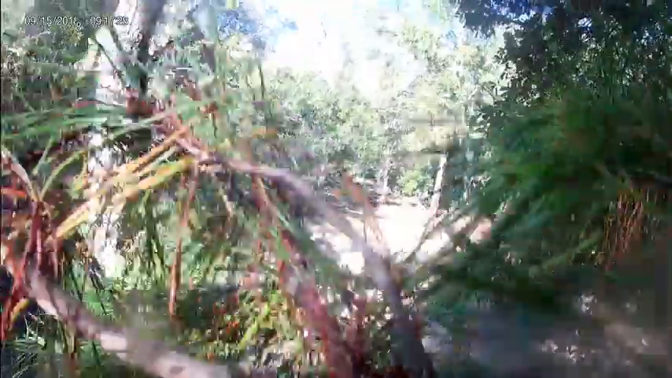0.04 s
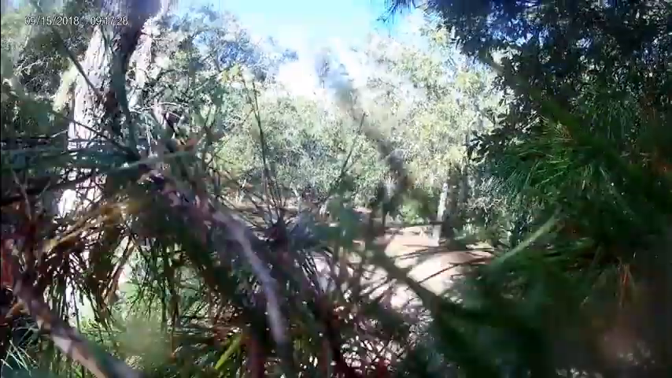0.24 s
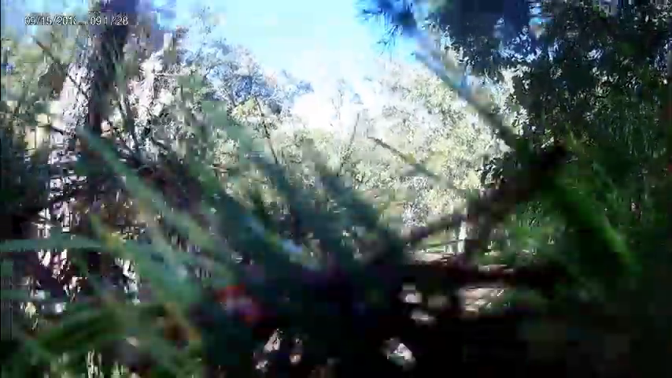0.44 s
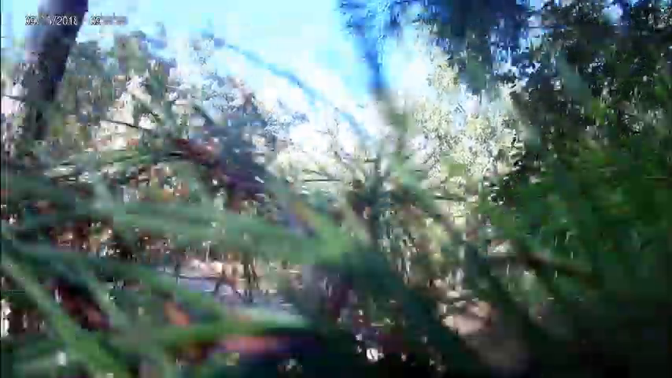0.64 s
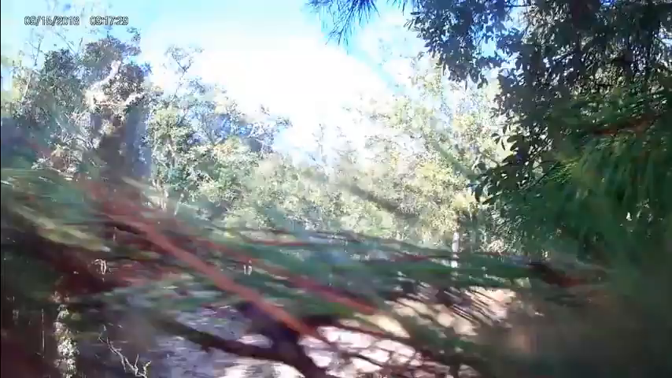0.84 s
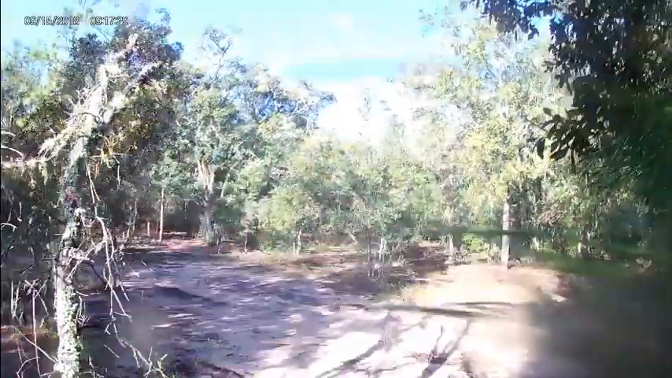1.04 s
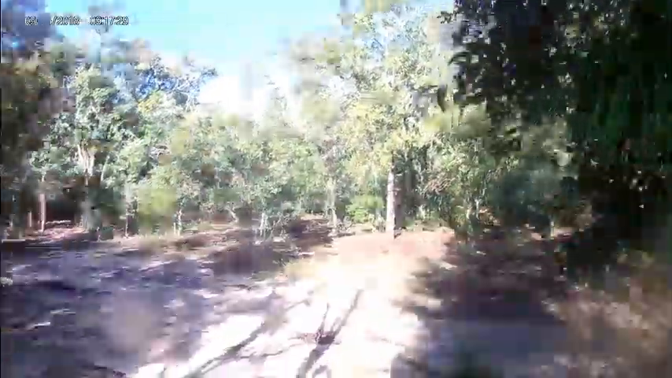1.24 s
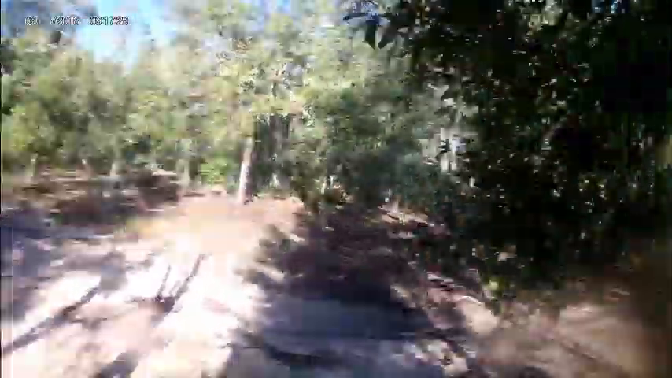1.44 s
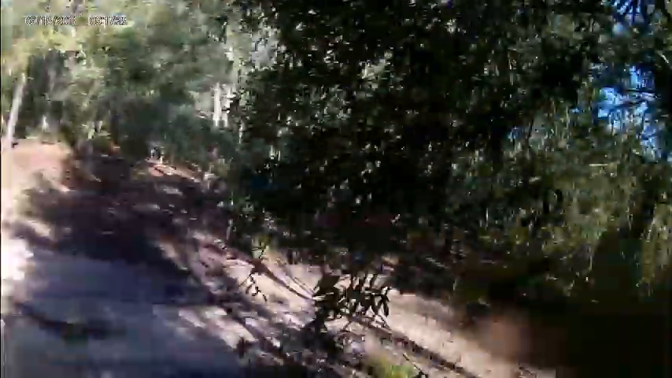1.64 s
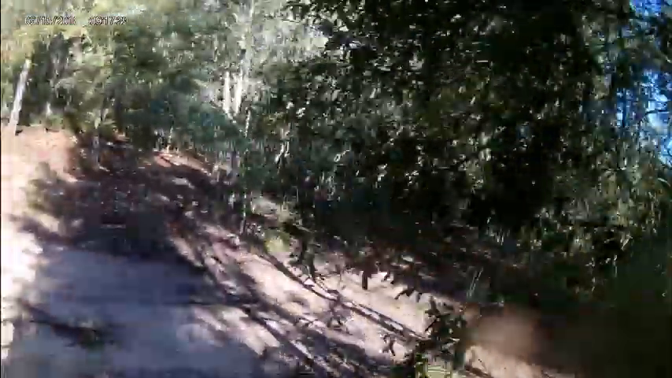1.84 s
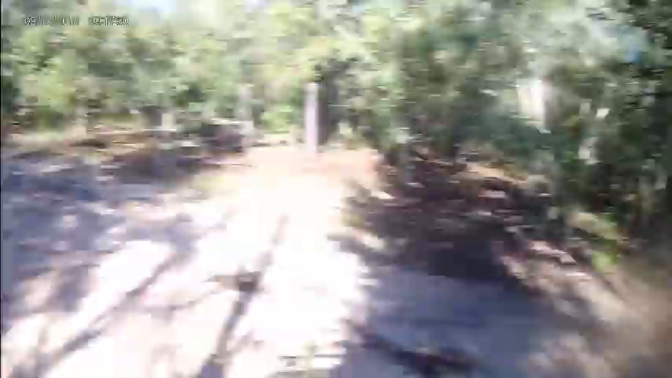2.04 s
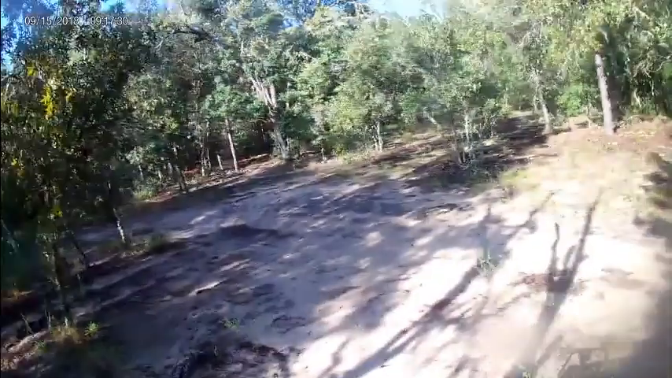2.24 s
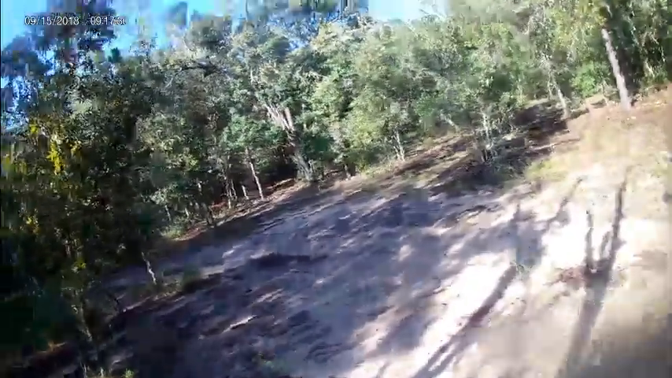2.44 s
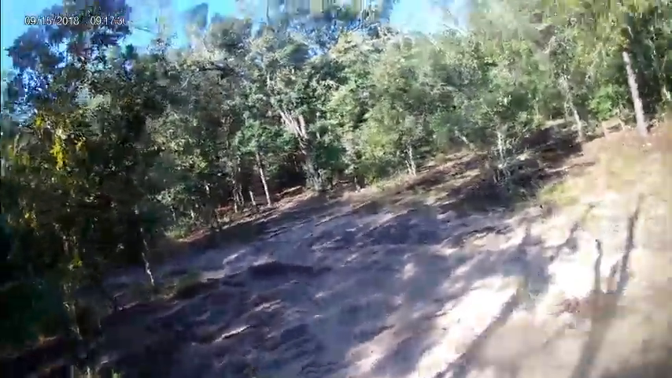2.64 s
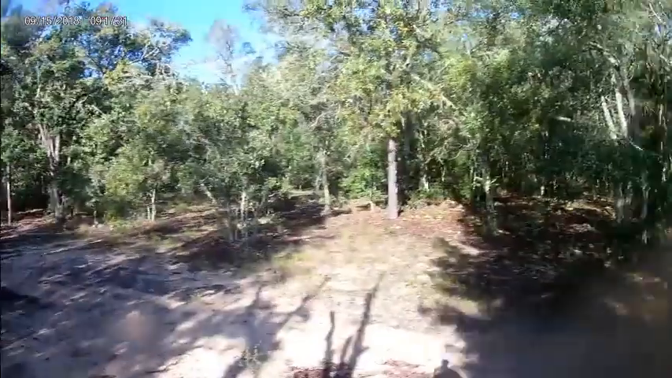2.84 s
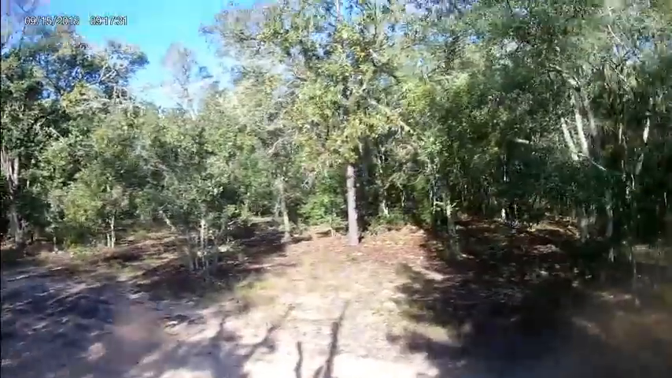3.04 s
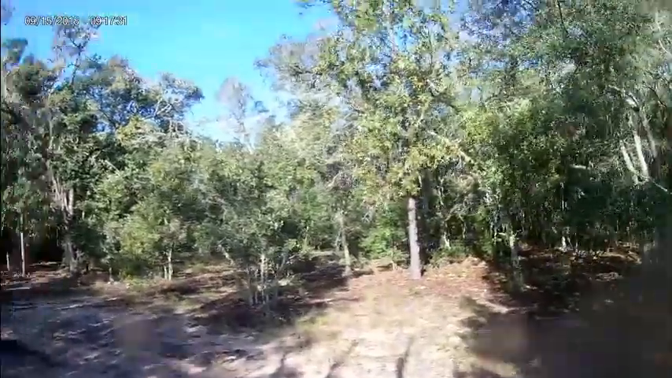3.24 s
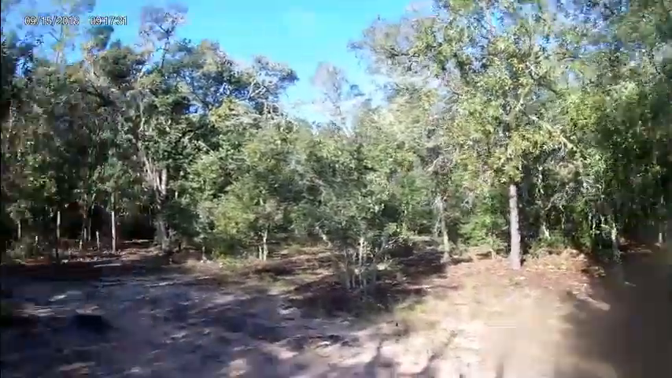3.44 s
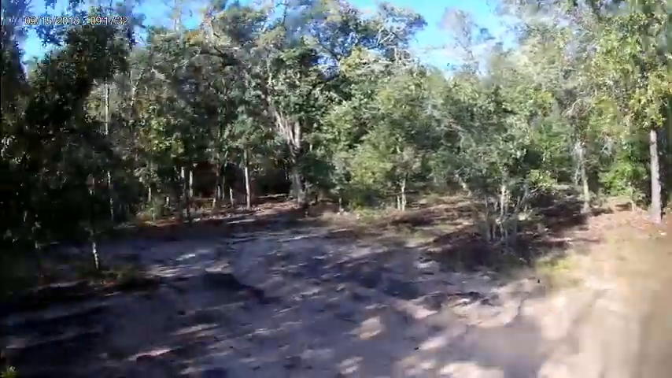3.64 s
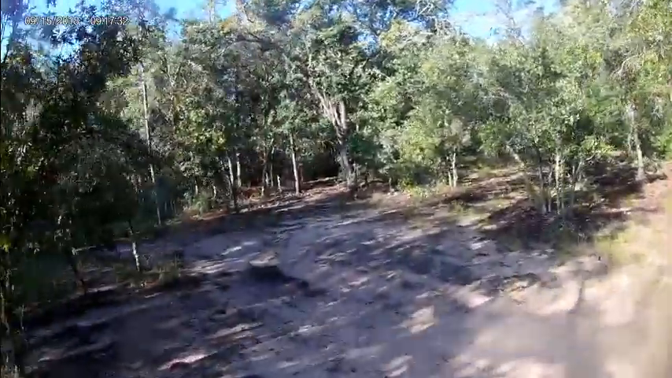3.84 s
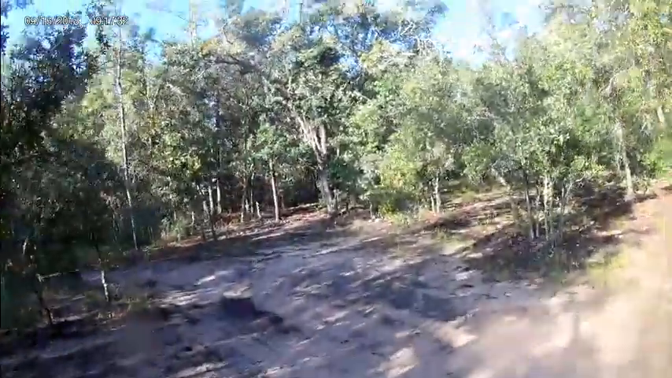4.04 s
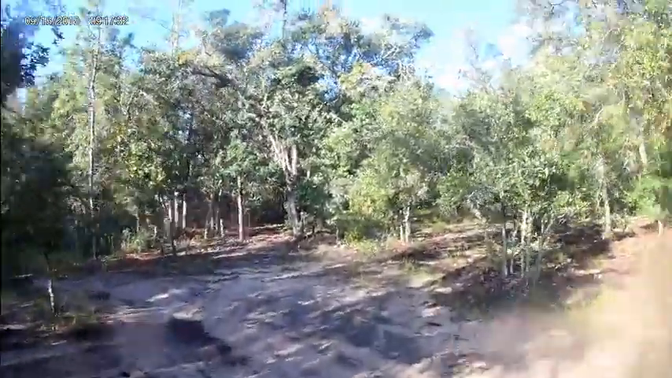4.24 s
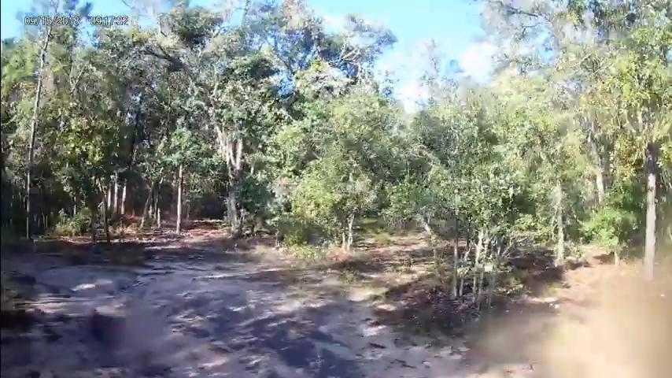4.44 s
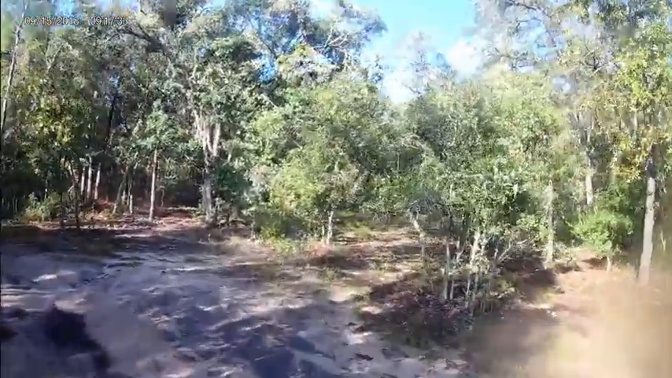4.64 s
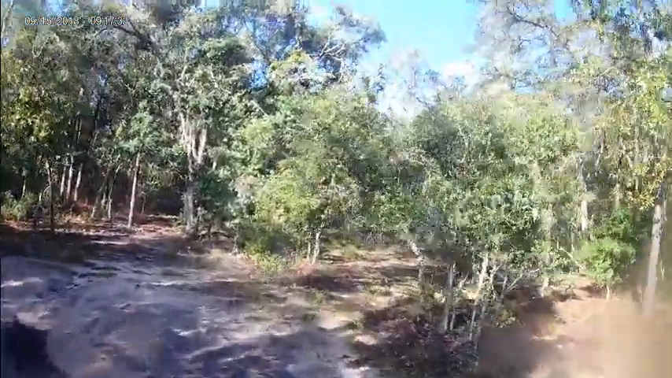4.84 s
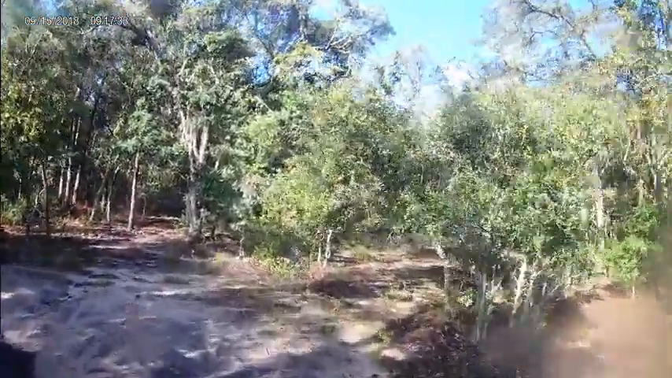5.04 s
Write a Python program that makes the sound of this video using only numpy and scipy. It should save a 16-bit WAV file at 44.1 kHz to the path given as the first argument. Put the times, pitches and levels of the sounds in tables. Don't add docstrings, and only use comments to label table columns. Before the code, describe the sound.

Outdoors on a sandy wooded track, a branch rubs a slow quad bike's camera: light brushing, then firm twig cracks and a hard sweep of needles, all boxy and resonant. It stops abruptly just after one second. A dull, low engine chug remains far below that level, dipping, with a small cluster of hollow rattles, then steadily speeding up over rumble and faint hiss, with a faint gear whine last.

```python
import sys
import numpy as np
from scipy import signal
from scipy.fft import rfft, irfft
from scipy.io import wavfile
from scipy.ndimage import uniform_filter1d

SR = 44100
rng = np.random.default_rng(int(sys.argv[2]) if len(sys.argv) > 2 else 0)


def volts_from_db(level):
    exponent = np.asarray(level, float) / 20
    return 10 ** exponent


def master(y):
    cut = np.clip(np.atleast_2d(y).T, -1, 1)
    pcm = np.round(cut * 32767)
    wavfile.write(sys.argv[1], SR, pcm.astype(np.int16))


N = 224954
T = np.arange(N) / SR

# start_s [s], twig_push_db [dB], needle_slide_db [dB]
BRUSHES = [
    [(0.0, -57, -66), (0.02, -58, -56.5), (0.094, -59, -56.5), (0.116, -53, -50), (0.176, -52, -56),
     (0.192, -49, -52), (0.26, -57, -65)],
    [(0.26, -49, -68), (0.306, -53, -52.5), (0.316, -50, -44.5), (0.348, -51.5, -52), (0.414, -46.5, -45.5),
     (0.434, -49, -58), (0.486, -57.5, -62.5), (0.6, -48.5, -54)],
]
# start_s [s], twig_push_db [dB], needle_slide_db [dB]
SHOVE = [
    (0.606, -41.5, -51),
    (0.662, -32, -42),
    (0.74, -35, -44),
    (0.752, -34, -40.5),
    (0.844, -36, -34),
    (0.864, -45.5, -33),
    (0.906, -32.5, -26.5),
    (1.088, -40, -37.5),
    (1.096, -46, -34.5),
]
# start_s [s], push_db [dB], slide_db [dB]
TOUCHES = [
    (1.22, -56.5, -80),
    (1.30, -63, -90.5),
    (1.372, -51, -88),
]
# start_s [s], peak_db [dB], thud_db [dB], needle_flick_db [dB]
BLOWS = [(0.118, -36, -58, -55.5), (0.157, -43, -37.5, -64), (0.193, -37, -47, -61.5),
         (0.232, -46, -53, -54), (0.315, -32.5, -48, -61), (0.344, -38, -54, -51), (0.388, -32, -68, -56),
         (0.407, -29, -42.5, -54), (0.652, -24, -31.5, -58), (0.693, -21.5, -32.5, -47),
         (0.749, -22, -38, -47), (0.769, -22.5, -36, -44), (0.794, -27, -34.5, -39),
         (0.83, -20, -36, -38.5), (0.875, -25, -44, -51), (0.9, -15.5, -32.5, -37),
         (0.904, -18, -32.5, -39.5), (0.929, -23, -37.5, -47.5), (0.995, -14, -38, -45),
         (1.004, -16.5, -49, -40.5), (1.032, -14.5, -50, -27.5), (1.067, -21.5, -38.5, -27),
         (1.095, -22, -50, -48)]
# start_s [s], peak_db [dB], low_part_db [dB], pitch_hz [Hz], snap_db [dB]
KNOCKS = [(2.118, -45, -48, 1010, -79), (2.143, -38, -37, 1540, -75), (2.166, -30, -43, 1550, -57),
          (2.173, -34.5, -48, 1540, -71), (2.179, -65, -44.5, 1490, -77), (2.199, -39.5, -53, 1550, -64),
          (2.207, -40.5, -50, 1000, -80), (2.223, -35, -43, 1230, -87), (2.226, -54, -42, 934, -88),
          (2.231, -36.5, -58, 1020, -88), (2.565, -55, -74, 1200, -93)]
# pitch_hz [Hz], width_hz [Hz], level_db [dB]
SHELL_MODES = [(120, 130, -5), (450, 34, -2.5), (725, 54, -13.5), (1235, 52, -4.5), (1576, 76, -18),
               (2285, 120, -5), (3514, 360, -5.5), (4030, 106, 2.5), (5240, 410, -25), (6140, 170, -10),
               (6680, 370, -13.5), (7540, 33, -30), (7000, 69, -10)]
# pitch_hz [Hz], level_db [dB]
SHELL_SKIN = [(30, -33.5), (300, -25), (600, -18.5), (1500, -12), (2800, -25), (4500, -6), (5200, -17),
              (7500, -30), (9500, -22.5), (12000, -24.5)]
CONTACT_GAP = [7750, 8350]
# start_s [s], firings_per_s [1/s]
REVS = [(0, 17.9), (1.2, 17.89), (1.6, 17.1), (1.85, 16.24), (2.05, 14.66), (2.25, 15.04), (2.45, 16.43),
        (2.8, 17.97), (3.1, 19.48), (3.5, 20.07), (3.9, 20.56), (4.2, 20.56), (4.5, 22.55), (4.78, 24.36),
        (5.1, 25.2)]
# start_s [s], level_db [dB]
LOAD = [
    (0, -62),
    (1.3, -62.5),
    (1.7, -70.5),
    (2.4, -66.5),
    (2.9, -63),
    (3.5, -60.5),
    (4.4, -62),
    (4.7, -68),
    (5.1, -75),
]
# pitch_hz [Hz], width_hz [Hz], level_db [dB]
EXHAUST = [(250.6, 81, -0.5), (306, 70, -11), (459.4, 46, -12)]
# pitch_hz [Hz], width_hz [Hz], level_db [dB]
MUFFLER = [(119.2, 40, 0), (66, 70, -3)]
# pitch_hz [Hz], width_hz [Hz], level_db [dB]
FRAME = [(758, 45, 2.5), (1200, 108, 1.5), (1550, 97, -4), (1833, 56, -2.5), (2330, 92, -10.5),
         (3297, 56, -14.5)]
# firings_per_s [1/s], level_db [dB], loss_db [dB per 1/s away]
DRONE_AT = [(19.2, -66.5, 7), (22.4, -66, 7), (24.7, -62.5, 3)]
# pitch_hz [Hz], level_db [dB per Hz]
RUMBLE = [(12, -45), (20, -7), (108, -4), (180, -6.5), (248, -5), (390, -9.5), (762, -14.5), (848, -20),
          (1200, -15.5), (1410, -24.5), (1840, -23), (2540, -29), (12000, -44.5), (15600, -78),
          (22000, -120)]

LETS_GO_S, TRAILS_S, STEP_S = 1.102, 1.148, 0.009


def level(x, db):
    return x * volts_from_db(db) / np.sqrt(np.mean(x ** 2))


def curves(rows):
    s, *columns = np.transpose(rows)
    return [np.interp(T, s, c) for c in columns]


def noise():
    return rng.standard_normal(N)


def band(x, lo_hz, hi_hz, kind="bandpass", order=3):
    return signal.sosfilt(signal.butter(order, [lo_hz, hi_hz], kind, fs=SR, output="sos"), x)


def modes(x, table, count=1):
    out = 0
    for k, (hz, width_hz, db) in enumerate(table):
        y = x
        for _ in range(count):
            y = signal.lfilter(*signal.iirpeak(hz, hz / width_hz, SR), y)
        out = out + (-1) ** k * volts_from_db(db) * y
    return out


def colour(x, points):
    hz, db = np.transpose(points)
    grid_hz = np.arange(2049) * SR / 4096
    gain_db = np.interp(np.log(grid_hz + 1), np.log(hz), db)
    cep = irfft(np.log(volts_from_db(gain_db)))
    cep[1:2048] *= 2
    cep[2049:] = 0
    return signal.fftconvolve(x, irfft(np.exp(rfft(cep))))[:N]


def walk(rate):
    k = int(SR / rate)
    held = np.repeat(rng.standard_normal(N // k + 1), k)
    return 1.7 * uniform_filter1d(uniform_filter1d(held, k), k)[:N]


def grains(rate, spread_db):
    slips = (rng.random(N) < rate / SR) * np.clip(noise(), -2, 2)
    return slips * volts_from_db(spread_db * np.minimum(rng.exponential(size=N), 3))


def decay(x, decay_s):
    return signal.lfilter([1], [1, -np.exp(-1 / (decay_s * SR))], x)


def burst(s, db, decay_s):
    x = np.zeros(N)
    np.add.at(x, (np.asarray(s) * SR).astype(int), volts_from_db(db))
    return decay(x, decay_s)


def case(force):
    return modes(force, SHELL_MODES) + colour(force, SHELL_SKIN)


TOUCH_DB_PER_S = 455


def contact_db():
    trail_push_db, trail_slide_db, trail_fades_db = -47.5, -58.5, -14
    gone_push_db, gone_slide_db, sway_db_per_s = -53.5, -80, -61
    release = [(LETS_GO_S + STEP_S, trail_push_db, trail_slide_db),
               (TRAILS_S, trail_push_db, trail_slide_db + trail_fades_db),
               (TRAILS_S + STEP_S, gone_push_db, gone_slide_db)]
    both_db = np.array(curves(sum(BRUSHES, []) + SHOVE + release))
    both_db = both_db + sway_db_per_s * np.maximum(T - TRAILS_S, 0)
    for s, *db in TOUCHES:
        both_db = np.maximum(both_db, np.c_[db] - TOUCH_DB_PER_S * abs(T - s))
    return both_db


def branch():
    drag_db, hiss_db = contact_db()
    off = np.clip((T - TRAILS_S) / STEP_S, 0, 1)
    scrape_db = -10.5 + 0.25 * drag_db + 0.42 * hiss_db - 10 * off
    whip = np.clip(1 + (T - LETS_GO_S) / 0.18, 0, 1) * (1 - off)
    swish_db = -18 + 0.88 * hiss_db + 14 * whip
    squeak_db = hiss_db - 7 - 6 * T - TOUCH_DB_PER_S * np.maximum(T - 0.58, 0)
    fade = np.clip((1.6 - T) / 0.05, 0, 1)
    patchy = walk(68.95)
    coarse, fine = case(grains(1500, 1.1)), case(grains(9000, 1.17))

    shove = level(band(noise(), 15, 100, order=2), -8)
    creak = level(modes(coarse, [(440, 140, 0)]), -3.5) * volts_from_db(0.41 * (drag_db + 35))
    low_drag = level(modes(coarse, [(122, 90, -1), (288, 110, -6.5)]), -1.5)
    drag = (low_drag + shove + creak) * volts_from_db(drag_db + 1.0 * walk(25))

    scrape = level(band(fine, 560, 2800), 0) * volts_from_db(scrape_db + 1.2 * patchy)
    hiss = level(band(fine, 2800, 5300, order=2), 0) * volts_from_db(hiss_db + 0.8 * patchy + 0.7 * walk(150))
    swish = level(band(fine, 5800, 12000), 0) * volts_from_db(swish_db + 0.73 * patchy)
    squeak = level(modes(fine, [(4080, 490, 2), (4950, 700, 9.9), (6100, 530, 1.3)]), 0)
    squeak = squeak * volts_from_db(squeak_db + 1.8 * walk(52.6))
    return fade * (drag + scrape + hiss + swish + squeak)


def exhaust(pulses, puff, revs):
    hot = np.clip((revs - 15) / 8, 0, 1)
    cool_pipe = modes((1 - hot) * pulses, np.multiply(EXHAUST, [0.9, 1, 1]), count=3)
    hot_pipe = modes(hot * pulses, np.multiply(EXHAUST, [1.03, 1, 1]), count=3)
    breath = modes(puff * noise(), EXHAUST)
    load_db, = curves(LOAD)
    return volts_from_db(load_db) * (level(cool_pipe + hot_pipe, 0) + level(breath, -15))


def valve_tap(pulses, revs):
    gust = decay(np.roll(pulses, int(0.0034 * SR)), 0.01) * noise()
    tap_db = -72 - 4.5 * abs(revs - 18.9)
    return level(modes(gust, [(1634, 270, 0.0052), (1830, 118, 0)]), 0) * volts_from_db(tap_db)


def gear_whine(cycles):
    from_s, full_s, ends_s = 4.7, 4.85, 5.075
    late = T - full_s
    db = -55.5 + np.where(late < 0, 123, 14) * late
    db = db - 805 * np.maximum(T - ends_s, 0)
    hz = 1142 + 150 * np.maximum(T - from_s, 0)
    swell = np.clip((T - from_s) / 0.1, 0, 1) * (1 + 0.25 * np.cos(2 * np.pi * (cycles - 0.5)))
    swell = swell * volts_from_db(1.0 * walk(45))
    phase = 2 * np.pi * np.cumsum(hz * (1 + 0.0046 * walk(68))) / SR
    return np.sqrt(2) * swell * volts_from_db(db) * np.sin(phase)


def engine():
    revs, = curves(REVS)
    cycles = np.cumsum(revs) / SR
    cycles += 100 - cycles[int(3.324 * SR)]
    count = cycles.astype(int)
    size = volts_from_db(1.2 * rng.standard_normal(200))[count]
    pulses = (np.diff(count, prepend=count[0]) > 0) * size
    puff = (1 + np.cos(2 * np.pi * (cycles - 0.15))) / 2
    clatter = 0.75 + 0.8 * puff + 0.6 * (1 + np.cos(4 * np.pi * (cycles - 0.1))) / 2

    boom = level(modes(pulses, MUFFLER, count=3), -66.5)
    buzz = level(modes(clatter * volts_from_db(0.68 * walk(40)) * grains(9000, 0.97), FRAME), 0)
    buzz = buzz * volts_from_db(-67.5 + 0.95 * (revs - 18))

    shaken = (T > TRAILS_S) * volts_from_db(-67.5 - 16.5 * (T - TRAILS_S))
    ringing = shaken + volts_from_db(-75.5 + 1 * np.maximum(revs - 21, 0))
    ring = level(modes(clatter * noise(), [(1202, 135, 0)], count=2), 0) * ringing

    drone_db = np.max([db - slope * abs(revs - at) for at, db, slope in DRONE_AT], axis=0)
    drone = level(modes((0.4 + puff) * noise(), [(770, 42, 0), (1015, 60, -5)], count=2), 0)
    drone = drone * (volts_from_db(drone_db) + 0.6 * shaken)

    thump = exhaust(pulses, puff, revs)
    return thump + boom + buzz + drone + ring + valve_tap(pulses, revs) + gear_whine(cycles)


def rumble():
    steady = colour(noise(), RUMBLE)
    bumps = band(steady, 20, 200, order=2) * (volts_from_db(1.0 * walk(10)) - 1)
    return level(steady + bumps, -61)


def blows():
    s, crack_db, thud_db, flick_db = np.transpose(BLOWS)
    shell = case(noise())
    tick = volts_from_db(1.5) * band(case(burst(s + 0.0014, crack_db, 0.00005)), 750, 5100)
    crack = level(band(shell, 520, 3600), -8.5) * uniform_filter1d(burst(s, crack_db, 0.005), 90)
    flick_shape = uniform_filter1d(burst(s - 0.001, flick_db, 0.0012), 120)
    flick = level(band(shell, 5660, 14000), 4.4) * flick_shape
    push = uniform_filter1d(uniform_filter1d(burst(s + 0.0015, thud_db, 0.0004), 40), 40)
    thud = volts_from_db(29.5) * modes(push, [(115.6, 84, -9), (187, 70, -4), (440, 124, -2.5)])
    return tick + crack + flick - thud


def knocks():
    out = np.zeros(N)
    t = np.arange(2600) / SR

    def tone(hz, turn=0):
        return np.sin(2 * np.pi * (hz * t + turn))

    onset = np.sin(np.pi / 2 * np.minimum(t / 0.0016, 1)) ** 2
    for s, db, low_db, hz, snap_db in KNOCKS:
        turn = rng.random(5)
        hollow = tone(435) + 0.5 * tone(720, turn[0]) + 0.5 * tone(530, turn[1])
        low = volts_from_db(low_db - 1.0) * np.exp(-t / 0.0094) * hollow
        high = volts_from_db(db + 5.5) * np.exp(-t / 0.0013) * tone(hz)
        bright = tone(2150, turn[2]) + 0.8 * tone(2650, turn[3]) + 0.3 * tone(3450, turn[4])
        snap = volts_from_db(snap_db + 11) * np.exp(-t / 0.0035) * bright
        start = int((s + 0.00101) * SR)
        out[start:start + len(t)] -= (low + high + snap) * onset
    s, db = np.transpose(KNOCKS)[:2]
    grit = level(band(noise(), 600, 1700), -22) * burst(s + 0.0015, db, 0.009)
    return band(out + grit, 60, 3800, order=5)


def scene():
    contact = band(branch() + blows(), *CONTACT_GAP, "bandstop", order=4)
    return (contact + engine() + rumble() + knocks())[None]


def low_pass(x):
    return signal.sosfilt(signal.butter(12, 12180, fs=SR, output="sos"), x)


def record(dry):
    top_hz = 12050
    mix = signal.sosfilt(signal.ellip(10, 0.2, 70, top_hz, fs=SR, output="sos"), dry)
    return low_pass(mix)


dry = scene()
out = record(dry)
master(out)
```